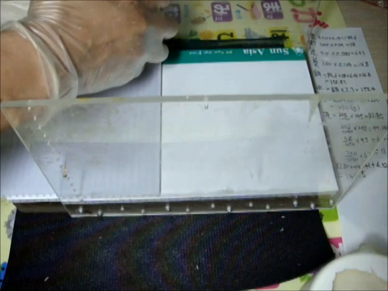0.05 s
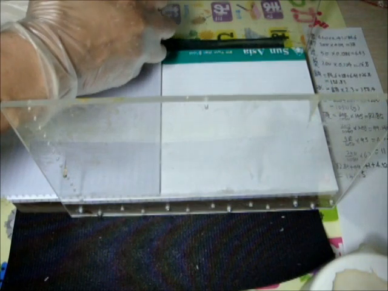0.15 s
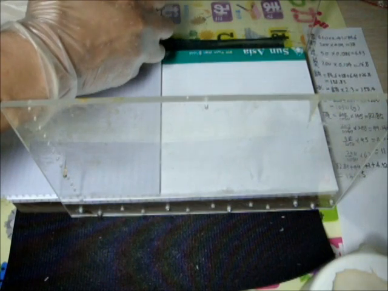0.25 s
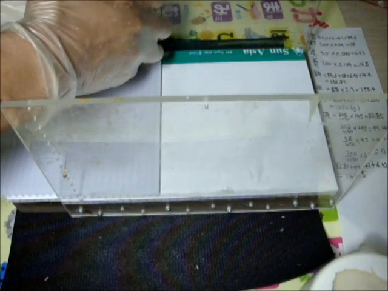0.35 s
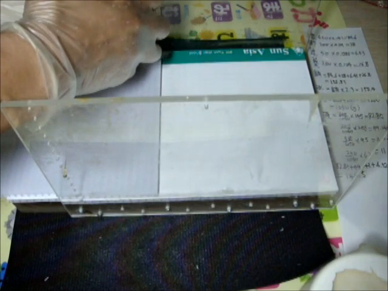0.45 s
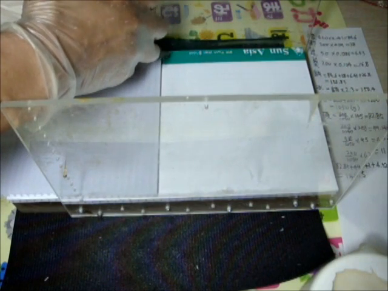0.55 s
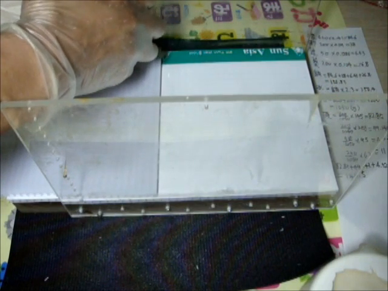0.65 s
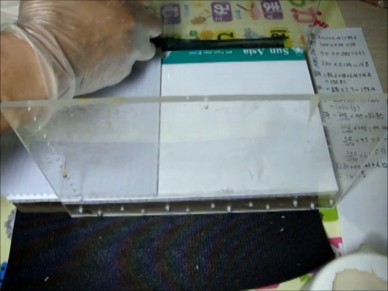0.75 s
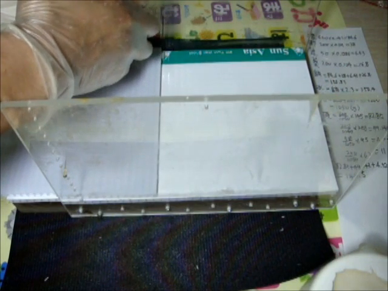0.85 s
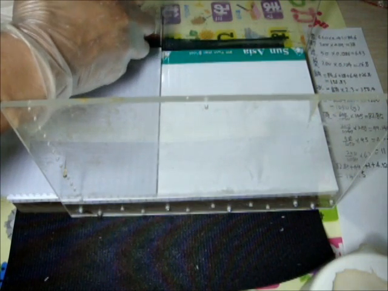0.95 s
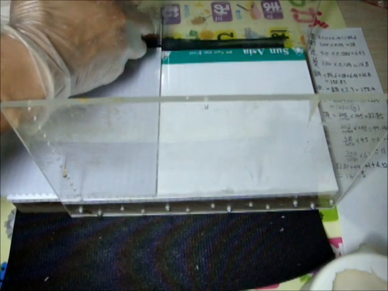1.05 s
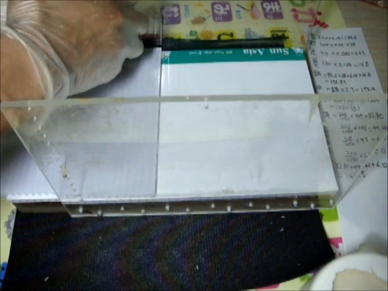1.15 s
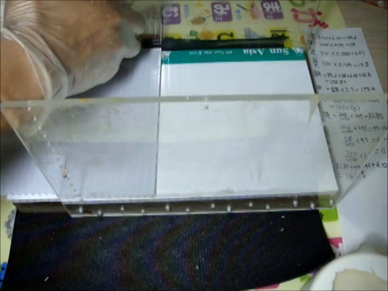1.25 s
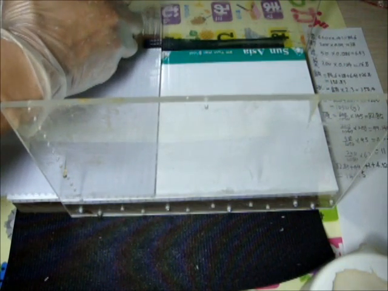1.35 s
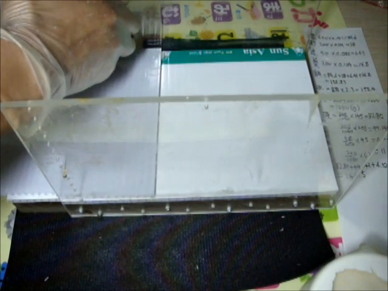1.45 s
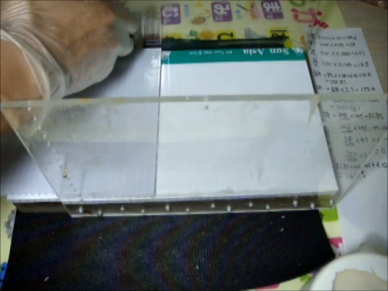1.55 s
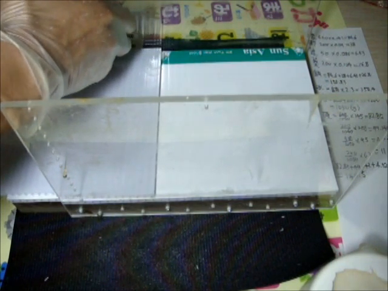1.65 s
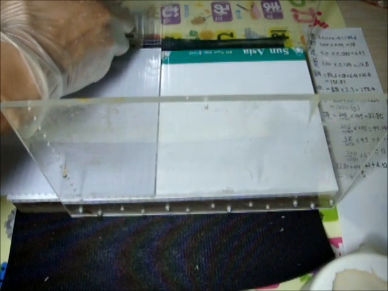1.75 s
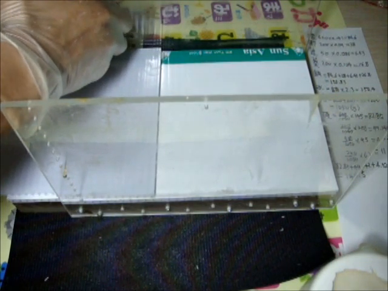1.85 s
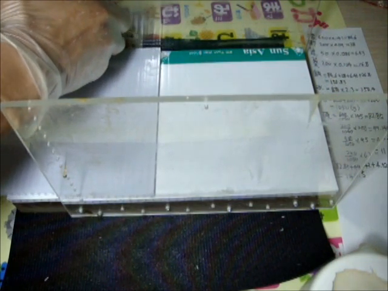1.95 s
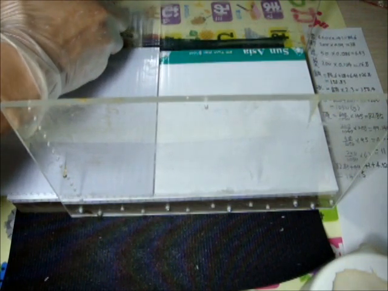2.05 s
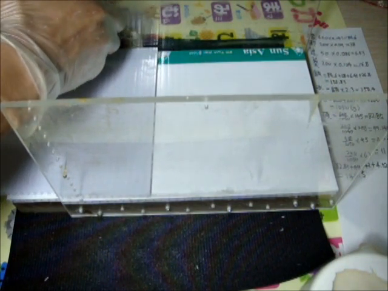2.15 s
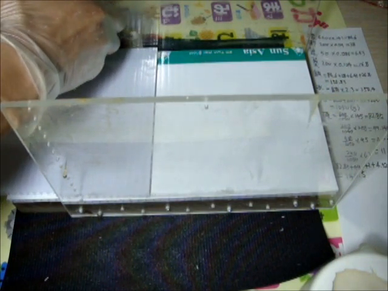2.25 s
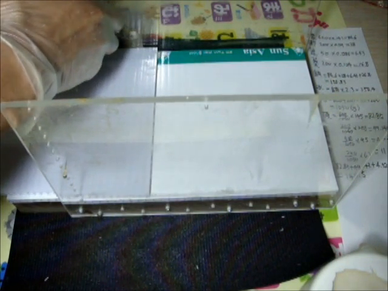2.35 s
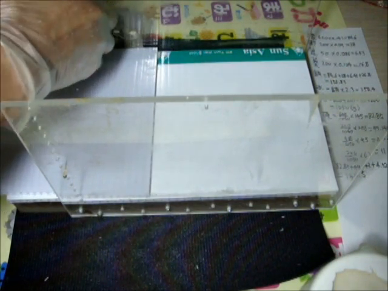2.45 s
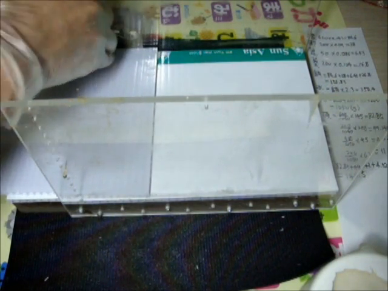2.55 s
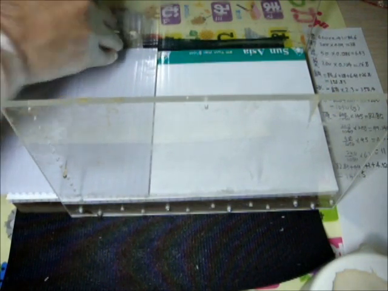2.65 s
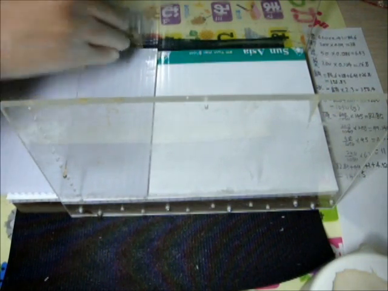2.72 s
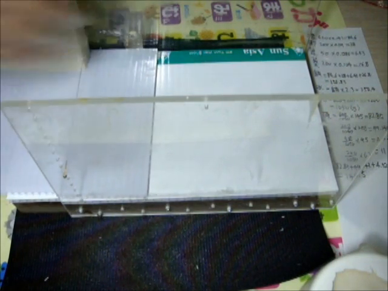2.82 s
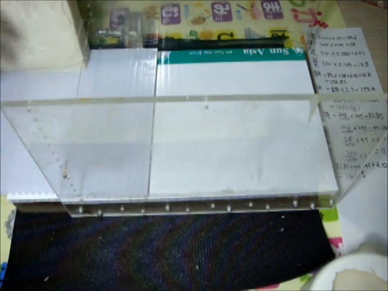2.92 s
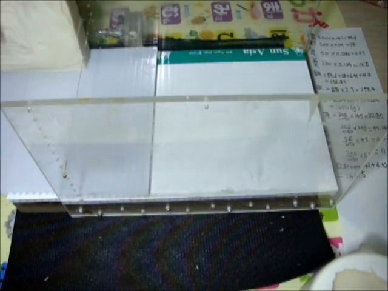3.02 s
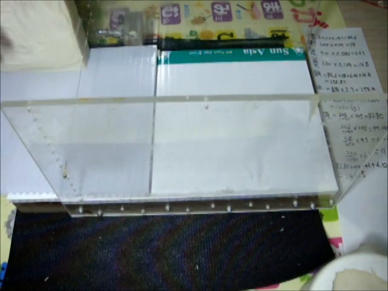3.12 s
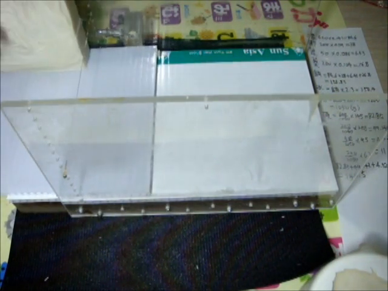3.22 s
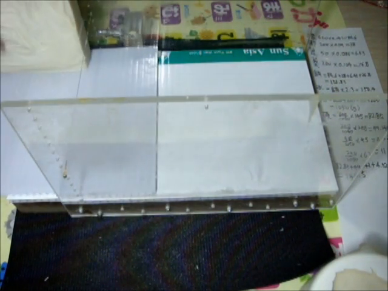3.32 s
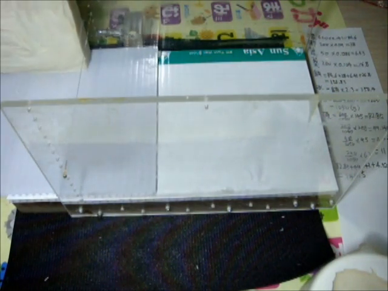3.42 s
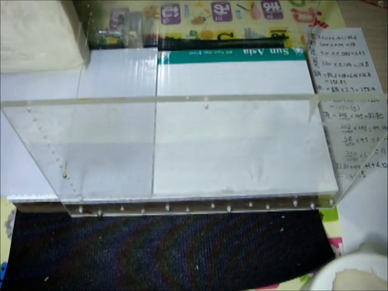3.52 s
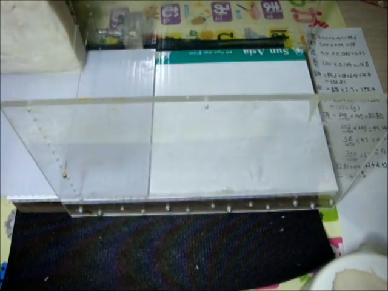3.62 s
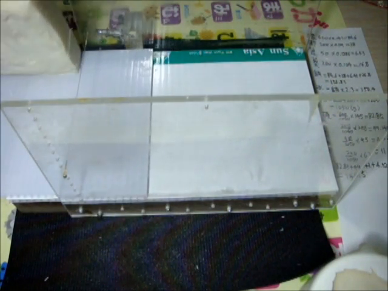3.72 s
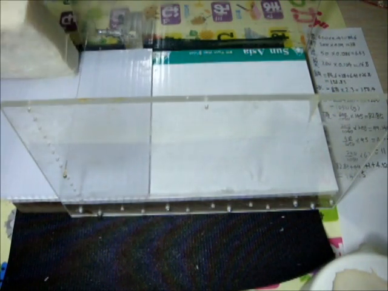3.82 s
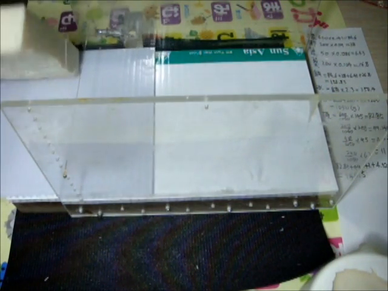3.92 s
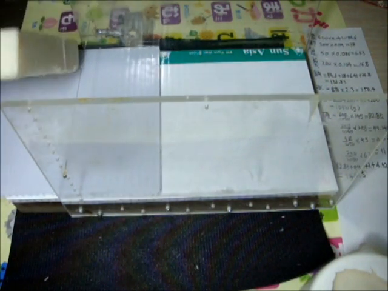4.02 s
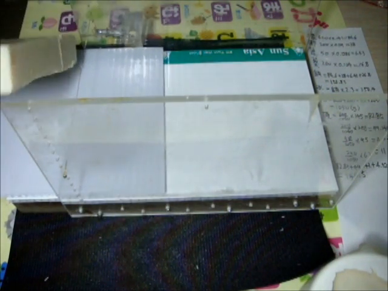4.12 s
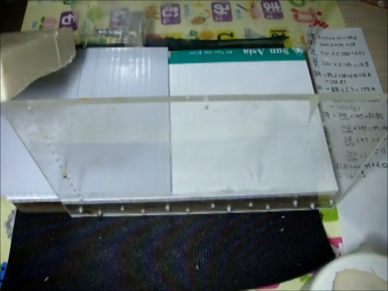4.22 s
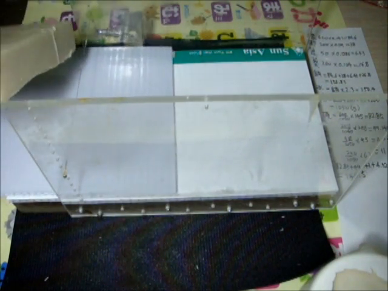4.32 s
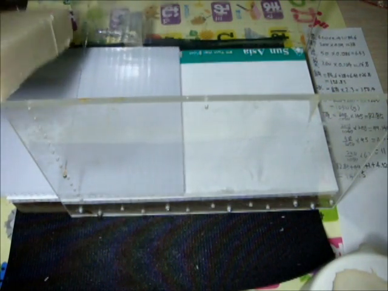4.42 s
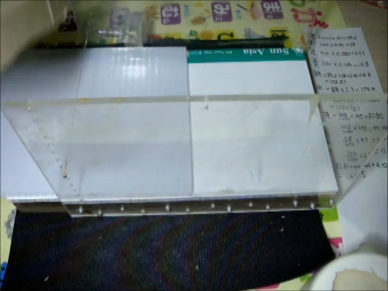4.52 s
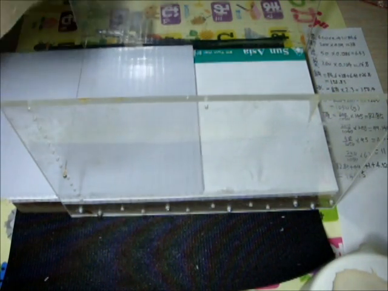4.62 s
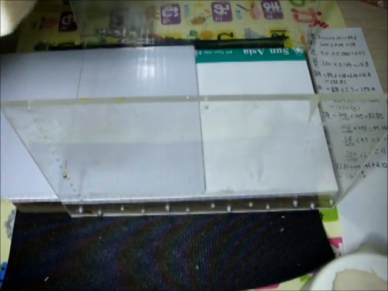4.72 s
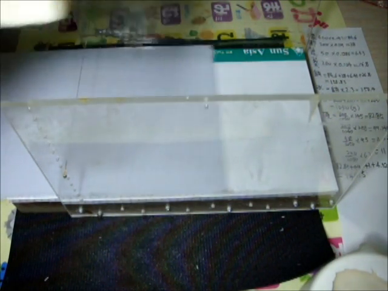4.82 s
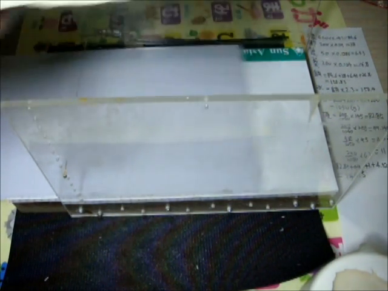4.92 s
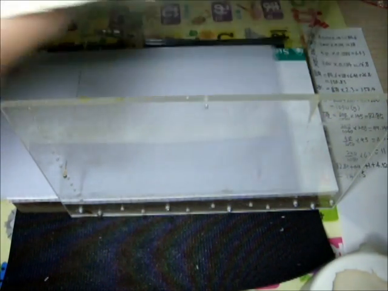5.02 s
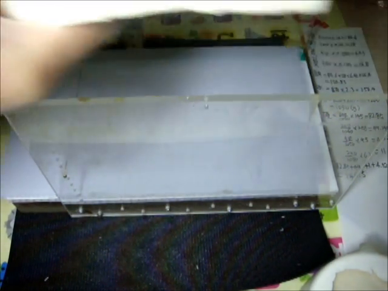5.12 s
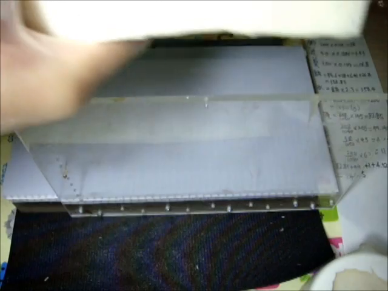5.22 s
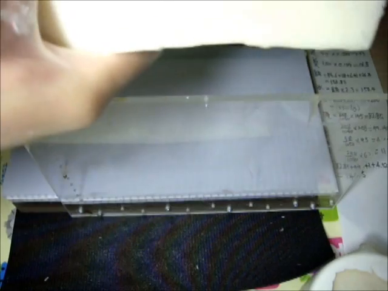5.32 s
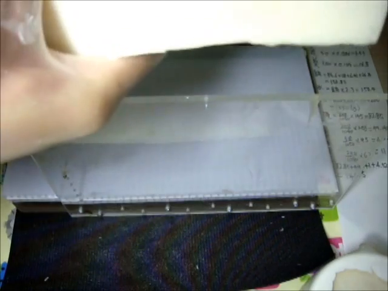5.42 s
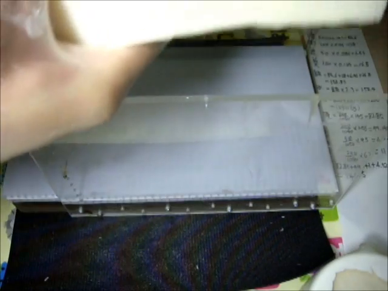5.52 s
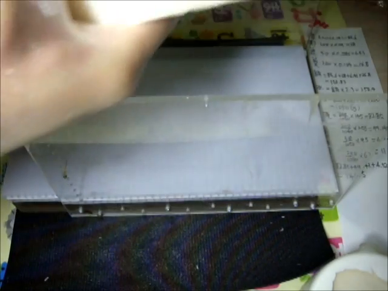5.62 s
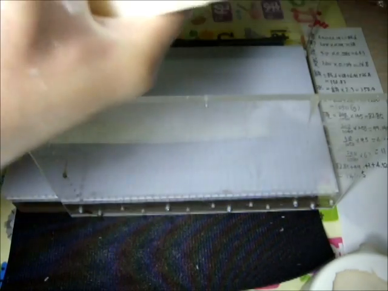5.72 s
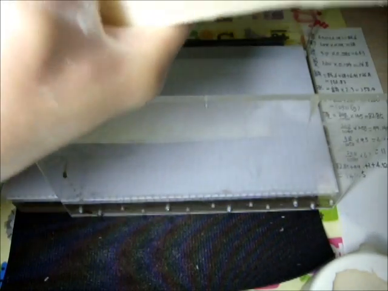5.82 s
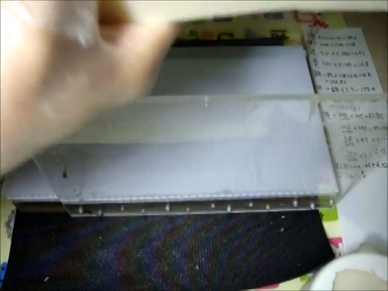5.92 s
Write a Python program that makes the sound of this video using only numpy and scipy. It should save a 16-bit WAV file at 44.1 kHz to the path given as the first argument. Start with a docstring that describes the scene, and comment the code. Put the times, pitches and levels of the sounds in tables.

```python
"""Blocks of soap are set down on a plastic cutting board and pushed along its hard guide, in a small room.
Each contact sums a damped low swing (thud), a brief tone with the board's modes (ring) and enveloped grit
(waxy crunch). A sliding block rasps: random tiny slips excite resonances under an arch of pressure.
Near reflections and a diffuse tail form the room; shaped noise is its steady sound and the microphone hiss."""
import sys
import numpy as np
from scipy import signal
from scipy.fft import rfft, irfft
from scipy.io import wavfile

SR = 44100
rng = np.random.default_rng(int(sys.argv[2]) if len(sys.argv) > 2 else 0)


def store_pcm(level_fs):
    """Save levels as 16-bit WAV."""
    pcm = np.round(np.clip(level_fs, -1, 1) * 32767).astype(np.int16)
    wavfile.write(sys.argv[1], SR, np.atleast_2d(pcm).T)


N = 263277

# Steady background spectrum, relative: (frequency [Hz], density level [dB])
BACKGROUND_SPECTRUM = [(20, -33), (45, -25.5), (100, -11.5), (135, -5.5), (230, -5.5), (290, -3), (520, -3),
                       (680, -3.5), (850, -7.5), (1250, -10), (2500, -14.5), (5000, -19.5), (8600, -22),
                       (10000, -25.5)]
# Narrow noise bands in the background, hum and whine: (frequency [Hz], width [Hz], level [dB])
BACKGROUND_BANDS = [(61.3, 11, -70), (176.3, 4.8, -63.5), (8860, 160, -66)]
BACKGROUND_DB = -47.5
BAND_EDGE_HZ = 10150

# First reflections from the table and walls: (delay [s], gain [ratio])
REFLECTIONS = [(.0052, 0.032), (.0090, 0.064), (0.0123, 0.095), (0.022, 0.13), (.0268, 0.047)]
# Decay time of the diffuse tail, for a fall of 60 dB: (frequency [Hz], time [s])
TAIL_T60 = [(150, 0.19), (550, 0.51), (1500, 0.5), (4000, .32), (10000, .22)]
# Energy of the diffuse tail relative to the direct sound: (frequency [Hz], level [dB])
TAIL_LEVEL = [(150, -16.5), (550, -8), (1500, -8.5), (4000, -14.5), (10000, -57)]

# Resonances that colour the rubbing: (frequency [Hz], width [Hz], relative level [dB])
RUBBING_RESONANCES = [(418, 164, -1.5), (646, 78, 4), (1214, 133, 7.5), (2183, 240, 5), (3360, 310, 3),
                      (4690, 400, 2), (5820, 290, 1.5), (6630, 190, 2), (7730, 380, 0), (9280, 730, -0.5)]
# A block is pushed, or shifts its seat:
# (start [s], length [s], friction level [dB], share of sharp slips [0-1])
PUSHES = [ (2.496, 0.03, -39.5, 0.8), (2.757, 0.029, -46, 1), (3.299, 0.021, -40, 0),
          (3.502, 0.021, -31, 0.6), (3.537, .06, -42.5, .03), (3.607, 0.058, -42.5, 0),
          (4.019, 0.046, -50.5, 1), (4.225, 0.015, -29.5, 0), (4.373, .16, -48, 0),
          (4.578, 0.068, -52, 0.5), (4.649, 0.045, -38, 0), (4.684, .028, -35.5, 0.13),
          (4.705, 0.057, -46, 0.4), (4.797, 0.039, -47.5, 0), (4.838, 0.022, -39, 0.1),
          (4.894, 0.16, -31.5, 1), (5.054, 0.12, -45, 0.98), (5.206, 0.095, -49, 0.04),
          (5.884, 0.082, -50, 0.93)]
GRIP_S, STOP_S = 0.0091, 0.012  # each push gets going quickly and stops a little more slowly
EASE_DB = -0.5  # pressure at the ends of a stroke relative to its middle

# Modes of the board and its guide: (frequency [Hz], relative level [dB], 60 dB decay time [s])
BOARD_MODES = [(318.5, -8.5, 0.098), (392.7, 3, 0.076), (525, -4.5, 0.33), (545.7, -1, 0.063),
               (737, -1.5, 0.055), (1060, -7, 0.04), (1210, -6.5, 0.078), (1290, 0.5, 0.025),
               (2220, -3.5, 0.034), (2604, -10.5, 0.04), (3400, -18, 0.05)]
# A block lands with its weight:
# (time [s], thud level [dB], thud pitch [Hz], clack level [dB], clack pitch [Hz], crunch level [dB])
KNOCKS = [ (2.2031, -7, 611, -14, 1027, -28.5), (2.531, -29, 368, -30, 1236, -46),
          (3.3616, -36, 416, -45, 728, -43), (3.3671, -28, 410, -41.5, 750, -46),
          (3.532, -16, 406, -22.5, 1620, -25.5), (3.6215, -16.5, 364, -23.5, 1266, -28.5),
          (4.1984, -24, 503, -24.5, 718, -36), (4.2276, -29.5, 615, -28, 1308, -46),
          (4.8930, -25.5, 438, -31, 1230, -47), (4.9119, -23, 400, -36, 1200, -49),
          (5.1790, -12, 566, -25, 1060, -24.5), (5.2064, -23.5, 576, -40, 1600, -41)]
# Only an edge or corner catches: (time [s], clack level [dB], clack pitch [Hz], crunch level [dB])
TICKS = [ (0.3436, -48, 2400, -35.5), (1.411, -37.5, 2800, -57), (1.8685, -40, 2400, -47),
         (2.4273, -41, 2900, -46), (2.7795, -39, 3480, -37.5), (3.3089, -32.5, 1790, -42.5),
         (3.4255, -33, 2880, -46), (3.5122, -15.5, 2360, -23), (3.5262, -30, 1400, -59),
         (4.0969, -61, 3820, -39), (4.8370, -30, 2200, -25.5), (4.8652, -31, 2180, -30.5),
         (5.203, -29, 1340, -34), (5.23, -41, 1360, -34)]
# Board ring relative to the clack [dB], decay of the crunch [s], swings of the clack (a corner's is drier)
KNOCK_RING_DB, KNOCK_CRUNCH_S, KNOCK_CYCLES = -8.5, 0.0018, 6.4
TICK_RING_DB, TICK_CRUNCH_S, TICK_CYCLES = -20.5, 0.0032, 4.7
TICK_THUD_DB, TICK_THUD_HZ = -16.5, 506  # the slight thud under a tick; level relative to its clack
CHATTER_DB, CHATTER_S = -18, 0.0067  # chatter after a contact: level relative to the clack, decay


def amp(db):
    """Level law: decibels to an amplitude ratio."""
    return 10 ** (np.asarray(db) / 20)


def unit(x):
    """Normalisation: scales a signal to rms 1."""
    return x / np.sqrt(np.mean(x ** 2) + 1e-20)


def read(points, hz):
    """Interpolation of a table on a logarithmic frequency axis."""
    f, value = np.transpose(points)
    return np.interp(np.log(hz + 1), np.log(f + 1), value)


def add(mix, s, sound):
    """Superposition: adds a sound into the mix, in place, at time s."""
    part = mix[max(round(s * SR), 0):][:len(sound)]
    part += sound[:len(part)]


def resonate(x, hz, width):
    """Simple resonance: a band-pass with gain 1 at its centre."""
    return signal.lfilter(*signal.iirpeak(hz, hz / width, fs=SR), x)


def soften(x, corner_hz):
    """First-order low-pass: a gentle loss of treble."""
    return signal.lfilter(*signal.butter(1, corner_hz, fs=SR), x)


def background():
    """Stationary random noise: spectrally shaped room noise and hiss, with a faint hum and a thin whine."""
    hz = np.fft.rfftfreq(N, 1 / SR)
    shape = amp(read(BACKGROUND_SPECTRUM, hz)) * (hz < BAND_EDGE_HZ)
    hiss = unit(irfft(rfft(rng.standard_normal(N)) * shape, N))
    bands = np.zeros(N)
    for centre, width, db in BACKGROUND_BANDS:
        bands += amp(db) * unit(resonate(rng.standard_normal(N), centre, width))
    return amp(BACKGROUND_DB) * hiss + bands


def diffuse_tail():
    """Exponential decay of a diffuse field: the lows and the high treble fade soonest, the middle lingers."""
    hz, t, bins = signal.stft(rng.standard_normal(SR), SR, nperseg=256)
    t60 = read(TAIL_T60, hz)[:, None]
    decay = amp(read(TAIL_LEVEL, hz)[:, None] - 60 * t / t60)
    unit_energy = np.sqrt(2 * np.log(1000) / (t60 * SR))  # so the table sets the energy of the whole tail
    return signal.istft(bins * decay * unit_energy, SR, nperseg=256)[1]


def room(x):
    """Room response: direct sound, a few near reflections, and a diffuse tail that begins among them."""
    out = x.copy()
    for delay, gain in REFLECTIONS:
        add(out, delay, gain * soften(x, corner_hz=3420))
    add(out, 0.008, signal.fftconvolve(x, diffuse_tail())[:N])
    return out


def slips(per_s, spread_db):
    """Random impulses: tiny slips of uneven size and either sign at a mean rate per second."""
    sizes = amp(spread_db * np.minimum(rng.exponential(1, N), 3))
    signs = rng.choice([-1, 1], N)
    return sizes * signs * (rng.random(N) < per_s / SR)


def friction(per_s, spread_db, direct):
    """Frictional excitation: each spot of the contact face drives its own resonance with its own slips."""
    at_surface = direct * soften(slips(per_s, spread_db), corner_hz=9000)
    through_plastic = np.zeros(N)
    for hz, width, db in RUBBING_RESONANCES:
        through_plastic += amp(db) * resonate(slips(per_s, spread_db), hz, width)
    return unit(at_surface + through_plastic)


def stroke(t, length):
    """Sliding contact: the block gets going, slides under an arch of pressure, and stops."""
    moving = np.clip(np.minimum(t / GRIP_S, (length - t) / STOP_S), 0, 1)
    position = np.clip(2 * t / length - 1, -1, 1)  # -1 at the start, 0 in mid-stroke, 1 at the end
    return moving * amp(EASE_DB * position ** 2)


def slides():
    """Stick-slip friction: each push mixes dull rubbing with sharp, juddering slips by power share."""
    out, t = np.zeros(N), np.arange(N) / SR
    dull = unit(soften(friction(per_s=3000, spread_db=6.0, direct=0.058), corner_hz=2200))
    judder_db = unit(resonate(rng.standard_normal(N), hz=110, width=100))  # 1 dB rms
    sharp = unit(friction(per_s=1400, spread_db=7.0, direct=0.079) * amp(judder_db))
    for start, length, db, share in PUSHES:
        rubbing = np.sqrt(1 - share) * dull + np.sqrt(share) * sharp
        out += amp(db) * stroke(t - start, length) * rubbing
    return out


def thud(t, hz, rise):
    """Heavily damped oscillation: the block's weight pushes the board through a few swings."""
    swell = (t / rise) ** 2 * np.exp(2 * (1 - t / rise))  # peaks at 1 when t = rise
    return swell * np.sin(2 * np.pi * hz * t)


def clack(t, hz, cycles, overtone, overtone_db):
    """Damped local vibration: the struck spot rings at its own pitch; soft wax mutes a high overtone."""
    upper = soften(np.sin(2 * np.pi * hz * overtone * t), corner_hz=1500)
    tone = np.sin(2 * np.pi * hz * t) + amp(overtone_db) * upper
    return tone * np.exp(-hz * t / cycles) * (1 - np.exp(-hz * t))


def ring(t, attack):
    """Modal superposition: each board mode decays at its own rate; neighbours swing in opposite directions."""
    modes = np.zeros(len(t))
    for k, (hz, db, t60) in enumerate(BOARD_MODES):
        modes += (-1) ** k * amp(db - 60 * t / t60) * np.sin(2 * np.pi * hz * t)
    return modes * (1 - np.exp(-t / attack))


def crush(t, decay, onset):
    """Yield under load: an envelope that builds with pressure, then settles; peak 1."""
    press = (1 - np.exp(-t / onset)) * np.exp(-t / decay)
    return press / press.max()


def knocks():
    """Impact excitation: every contact sums thud, clack with board ring, brief chatter and waxy crunch."""
    out, t = np.zeros(N), np.arange(SR // 2) / SR
    grit = friction(per_s=12000, spread_db=-0.5, direct=1.0)
    rattle = unit(soften(friction(per_s=3500, spread_db=6, direct=0.03), corner_hz=1500))

    def contact(s, thud_db, thud_hz, clack_db, clack_hz, crunch_db, ring_db, crunch_s, cycles):
        """Linear superposition of the parts of one contact."""
        now = (round(s * SR) + np.arange(len(t))) % N
        weight = amp(thud_db) * thud(t, thud_hz, rise=0.0025)
        plastic = clack(t, clack_hz, cycles, overtone=1.99, overtone_db=-4.5)
        plastic += amp(ring_db) * ring(t, attack=0.00029)
        chatter = amp(CHATTER_DB) * crush(t, CHATTER_S, onset=0.00081) * rattle[now]
        wax = crush(t, crunch_s, onset=0.00017) * grit[now]
        return weight + amp(clack_db) * (plastic + chatter) + amp(crunch_db) * wax

    for s, *blow in KNOCKS:
        add(out, s, contact(s, *blow, KNOCK_RING_DB, KNOCK_CRUNCH_S, KNOCK_CYCLES))
    for s, db, hz, crunch_db in TICKS:
        blow = (db + TICK_THUD_DB, TICK_THUD_HZ, db, hz, crunch_db)
        add(out, s, contact(s, *blow, TICK_RING_DB, TICK_CRUNCH_S, TICK_CYCLES))
    return out


def scene():
    """Radiation and superposition: the small board radiates little deep bass; room and background add."""
    bass_cut = signal.butter(1, 60, "high", fs=SR)
    handling = signal.lfilter(*bass_cut, knocks() + slides())
    return (room(handling) + background())[None]


def record(dry):
    """Band limitation: a steep linear-phase low-pass ends the spectrum."""
    low_pass = signal.firwin(601, BAND_EDGE_HZ, window=("kaiser", 8), fs=SR)
    return signal.oaconvolve(dry, low_pass[None], "same")


dry = scene()
out = record(dry)
store_pcm(out)
```